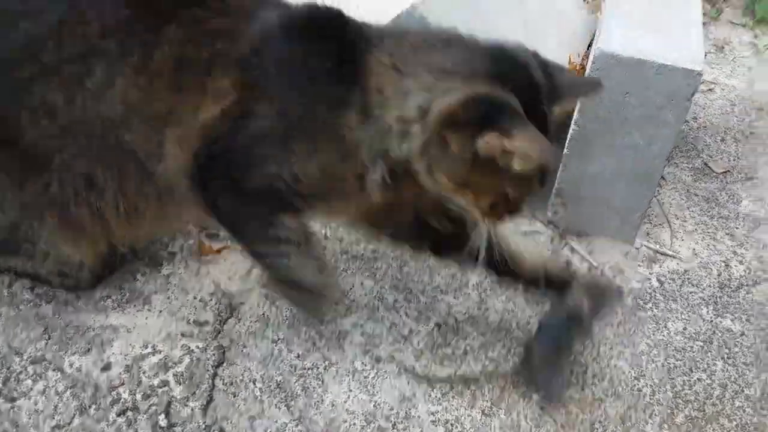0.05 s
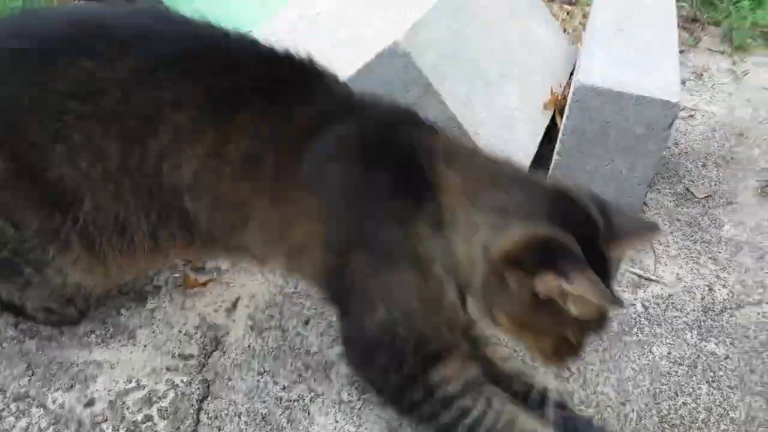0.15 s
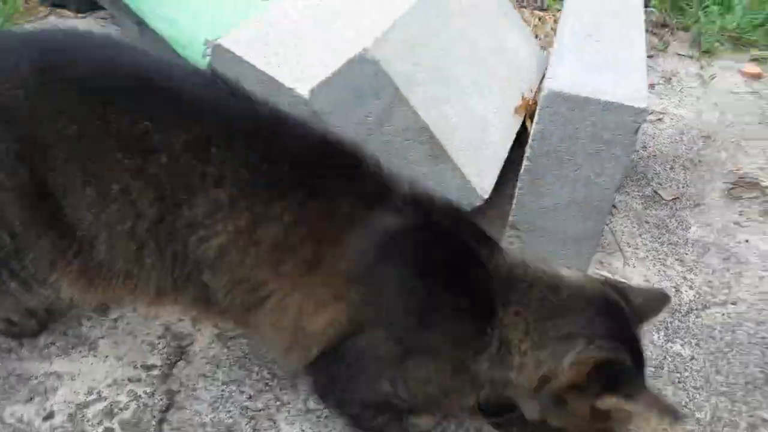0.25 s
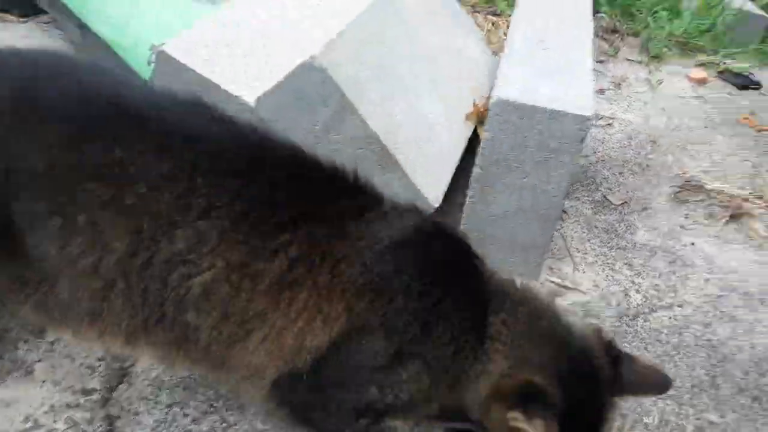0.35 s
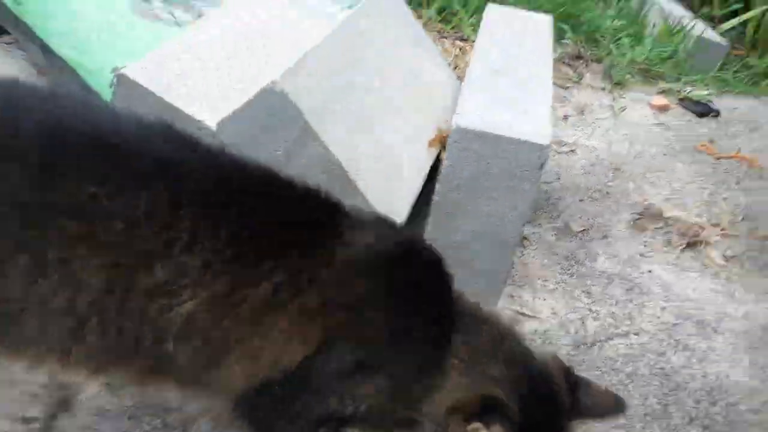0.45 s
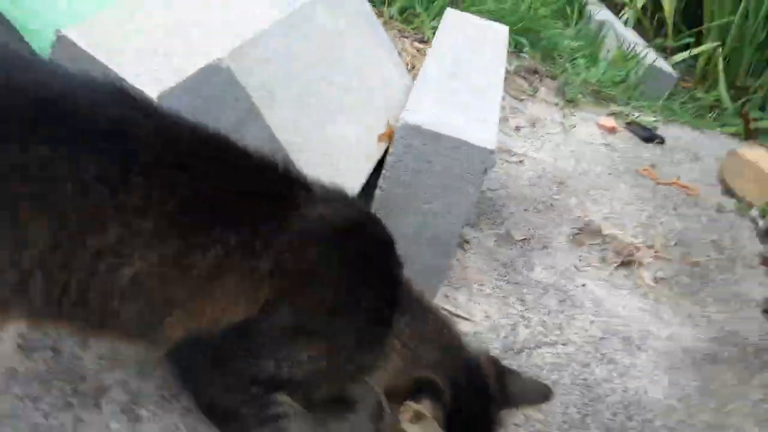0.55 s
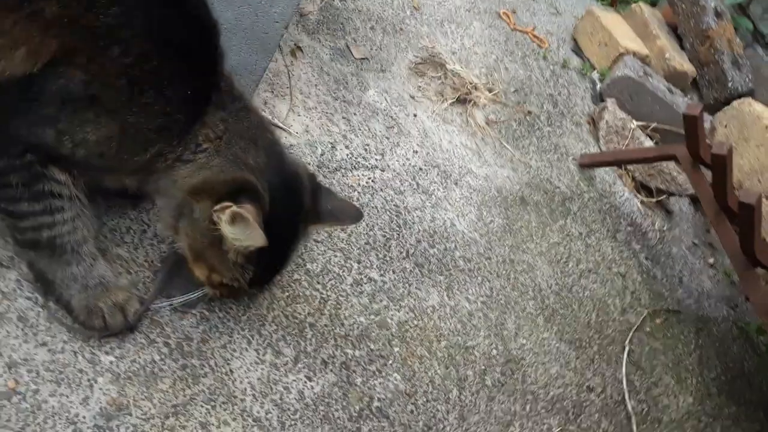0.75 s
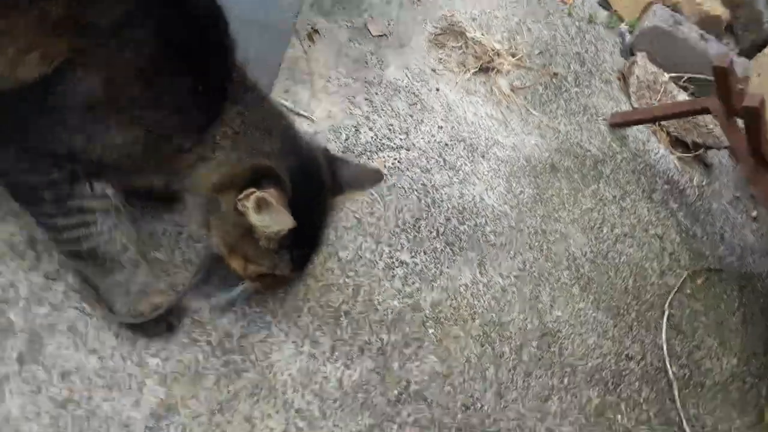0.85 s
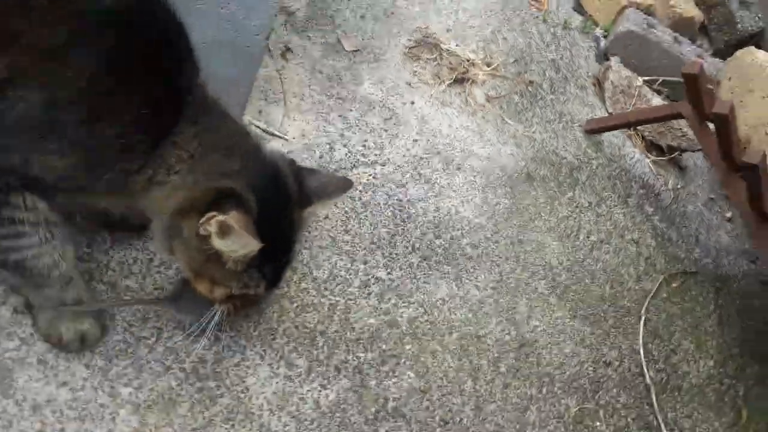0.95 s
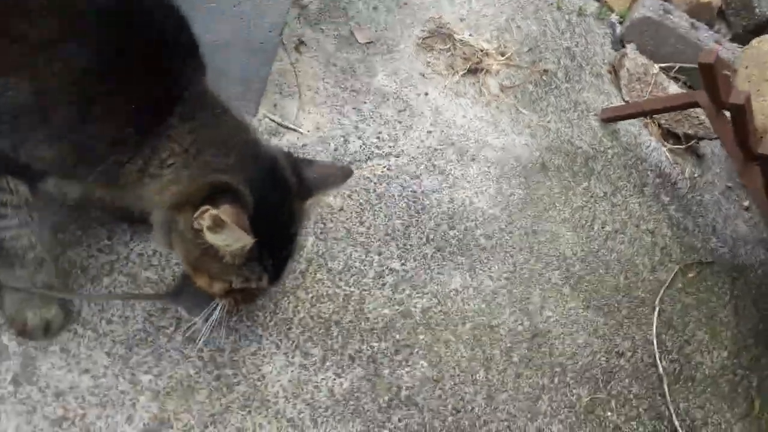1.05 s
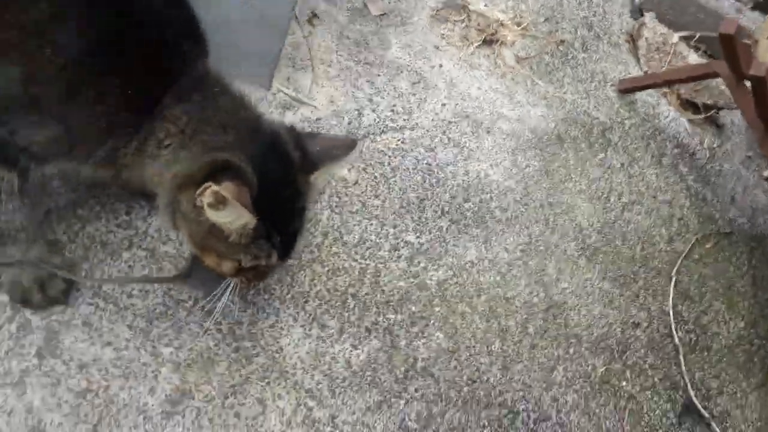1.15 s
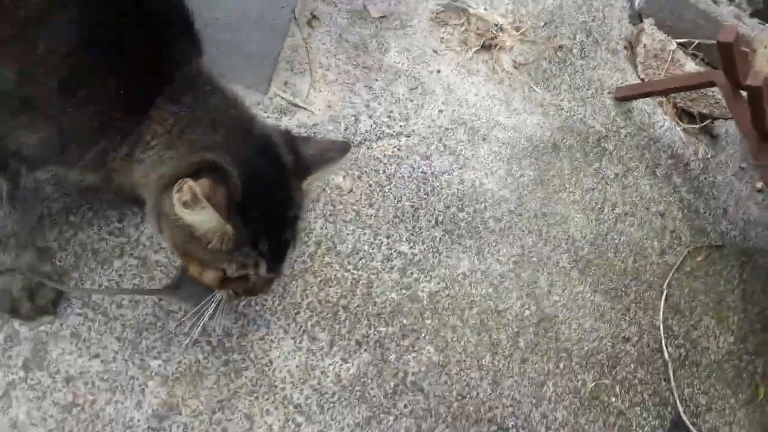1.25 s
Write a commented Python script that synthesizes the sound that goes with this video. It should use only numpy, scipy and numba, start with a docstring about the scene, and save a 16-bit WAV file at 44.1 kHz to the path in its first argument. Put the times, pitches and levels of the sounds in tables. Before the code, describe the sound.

A cat gives one short, harsh growl outdoors over a faint distant motor hum.

```python
"""A cat guards its catch on a concrete yard, close to the left microphone; a distant motor hums throughout.
At 0.2 s it starts one harsh growl, vocal-fold pulses ringing its throat: first a thin raspy snarl,
then a falling yowl that sinks into a rattle, and from 0.6 s a short yelp with a soft bump under it.
A paw scuffs the ground as the voice stops. Nearby walls return a faint, short echo of the growl."""
import sys
import numpy as np
from scipy import signal
from scipy.fft import rfft, irfft
from scipy.io import wavfile
from scipy.ndimage import uniform_filter1d
from numba import njit

SR = 44100
rng = np.random.default_rng(int(sys.argv[2]) if len(sys.argv) > 2 else 0)


def int16_out(signal):
    """Quantize to a 16-bit WAV file."""
    q = np.round(np.clip(np.atleast_2d(signal).T, -1, 1) * 32767)
    wavfile.write(sys.argv[1], SR, q.astype(np.int16))


N = 57330


def growl():
    """Uneven fold pulses and a puff of air in each cycle ring the throat; air hisses past the teeth."""
    # vocal-fold rate in the three parts of the growl (time [s], pitch [Hz])
    snarl_pitch = [(.195, 1273), (.21, 1195), (.222, 1026), (.246, 917), (.262, 1075), (.275, 1294),
                   (.287, 797.8), (.302, 858), (.318, 301.6), (.352, 271.3)]
    yowl_pitch = [(.366, 987), (.385, 1009), (.402, 990.7), (.415, 961), (.425, 999.2), (.435, 983.6),
                  (.45, 889), (.465, 869), (.473, 797.3), (.483, 746.7), (.491, 776.8), (.509, 693.2),
                  (.519, 725.5), (.53, 703), (.551, 659.5), (.574, 651), (.582, 560.4), (.596, 295.7)]
    yelp_pitch = [(.613, 630), (.624, 590), (.633, 720), (.644, 975), (.661, 1003), (.668, 975),
                  (.679, 810)]
    # how hard the cat pushes (time [s], relative level [dB])
    push = [(.192, -75), (.196, -46), (.215, -39.5), (.228, -38.5), (.24, -50.5), (.256, -37.5),
            (.27, -40.5), (.29, -49), (.301, -40.5), (.312, -50), (.328, -44), (.351, -47.5), (.37, -32.5),
            (.389, -26.5), (.399, -35), (.411, -31), (.436, -28.5), (.458, -31.5), (.475, -28),
            (.505, -25.5), (.568, -27), (.583, -33), (.6, -41.5), (.615, -31.5), (.626, -34.5),
            (.645, -24.5), (.661, -23.5), (.673, -30.5), (.681, -38), (.70, -66), (.73, -75)]
    # state of the folds (time [s], roughness [0-1], weakening of every second pulse [0-1])
    fold_state = [(.2, .4, 0), (.222, .15, 0), (.24, .6, .2), (.258, .22, .3), (.272, .7, .2),
                  (.35, .9, .2), (.376, .1, .7), (.389, .06, .55), (.398, .15, .05), (.44, .08, 0),
                  (.464, .25, .05), (.476, .35, .4), (.492, .1, 0), (.512, .2, .2), (.535, .33, .35),
                  (.565, .06, .1), (.582, .35, .15), (.6, .8, .1), (.614, .15, .1), (.632, .4, .35),
                  (.651, .1, .55), (.661, .06, .04), (.67, .15, .05), (.685, .9, .1)]
    # last lone snaps of the folds (time [s], level into the throat [dB])
    snaps = [(0.688, -18), (.6937, -13), (0.71, -18)]
    voice_db, quaver = 13, .009  # quaver: quick tremble, as a share of the pitch
    jitter, shimmer_db, rasp = .075, 2, .6  # at full roughness
    rasp_floor, puff_cycles = .05, .4
    hiss_db, hiss_hz = -16.5, 12750.
    rough, weak = curve(fold_state), curve(fold_state, axis=2)
    pitch = curve(snarl_pitch + yowl_pitch + yelp_pitch) * (1 + quaver * walk(150))
    chance = rng.standard_normal((N, 2))
    pulses, phase = vocal_folds(pitch, jitter * rough, shimmer_db * rough, weak, chance)
    air = unit(np.exp(-phase / puff_cycles) * rng.standard_normal(N))
    effort = undb(voice_db) * envelope(push)
    source = (pulses + (rasp_floor + rasp * rough) * air) * effort
    for at, db in snaps:
        source[int(at * SR)] += undb(db)
    hiss = undb(hiss_db) * steep_band(air * effort, np.full(N, hiss_hz), width_hz=1700.)
    return vocal_tract(source) + hiss


@njit
def vocal_folds(hz, jitter, shimmer_db, weak, chance):
    """One sharp pulse per cycle, each with its own length and size; also the phase of the cycle."""
    limp = .03  # cycles run long and short in turn, by this share at full weakening
    pulses, phase, turn, cycle = np.zeros(len(hz)), np.zeros(len(hz)), 0., 0
    for i in range(8, len(hz) - 9):
        detune = jitter[i] * chance[cycle, 0] + limp * weak[i] * (2 * (cycle % 2) - 1)
        step = hz[i] * np.exp(detune) / SR
        turn += step
        if turn >= 1:
            turn, cycle = turn - 1, cycle + 1
            shimmer = 10 ** (shimmer_db[i] * chance[cycle, 1] / 20)
            size = shimmer * (1 - weak[i] * (cycle % 2)) / np.sqrt(step)
            for j in range(-7, 8):  # a windowed sinc places the pulse between samples
                lag = j + turn / step + 1e-9
                window = .5 + .5 * np.cos(np.pi * lag / 8)
                pulses[i + j] += size * np.sin(np.pi * lag) / (np.pi * lag) * window
        phase[i] = turn
    return pulses, phase


def vocal_tract(source):
    """The throat gives a steady colour; the moving mouth adds three gliding resonances."""
    # throat response (frequency [Hz], gain [dB])
    throat_colour = [(300, -44), (600, -33), (760, -26), (980, -16), (1300, -14), (2000, -12), (2700, -9),
                     (3400, -9), (4000, -11), (4500, -8), (5700, -7), (6500, -17), (7600, -21), (8700, -38),
                     (10500, -27), (12400, -19), (14000, -18), (15800, -24)]
    # mouth resonances (time [s], low [Hz], gain [dB], main [Hz], gain [dB], upper [Hz], gain [dB])
    resonances = [(.21, 1100, -3, 5500, -10, 7600, 19.5), (.255, 2160, -5, 3320, -2.5, 7900, 7.5),
                  (.32, 1760, 8, 4950, -26, 6830, 9), (.37, 2280, -12, 4800, -6, 7600, -7),
                  (.39, 1140, 3.5, 4900, -7, 7360, 10.5), (.43, 1030, 0.5, 5240, 5.5, 7430, 14),
                  (.49, 1510, -42, 5880, 4.5, 6820, 7), (.56, 1310, -34, 5072, 8.5, 6300, -5),
                  (.615, 1370, -42, 4520, -1, 6940, 7), (.66, 2020, -43, 4520, 6, 7400, 5.5)]
    throat = colour(source, throat_colour)
    mouth = np.zeros(N)
    for k, width_hz in enumerate([800., 1700., 1400.]):
        hz, db = curve(resonances, axis=2 * k + 1), curve(resonances, axis=2 * k + 2)
        mouth += undb(db) * steep_band(throat, hz, width_hz)
    return throat + mouth


def bump():
    """A soft low bump under the yelp, equal in both microphones."""
    at_s, hz, width_s, db = .656, 221.4, .0032, -35.5
    t = np.arange(N) / SR - at_s
    return undb(db) * np.exp(-.5 * (t / width_s) ** 2) * np.sin(2 * np.pi * hz * t)


def scuff():
    """Paws and fur brush the concrete faintly as the cat settles."""
    # contact with the ground (time [s], level [dB])
    contact = [(.66, -70), (.685, -60), (.715, -51), (.75, -68), (.8, -83)]
    # colour of the brushing (frequency [Hz], relative level [dB])
    brush = [(150, -10), (400, -2), (900, 0), (2000, -5), (5000, -14), (14000, -26)]
    return envelope(contact) * np.array([unit(colour(rng.standard_normal(N), brush)) for _ in range(2)])


def echo(x):
    """Dull, short scatter from nearby blocks and walls, with its own tail at each microphone."""
    # colour of the scatter (frequency [Hz], gain [dB])
    walls = [(300, 0), (1000, 0), (2200, -3), (4000, -9), (6000, -13), (8000, -14), (14000, -18)]
    echo_db, t60_s, delay_s = -16, .08, .002
    t = np.arange(SR // 2) / SR
    tails = rng.standard_normal((2, len(t))) * undb(-60 * t / t60_s) * (t > delay_s)
    dull = colour(x, walls)
    return undb(echo_db) * np.array([signal.fftconvolve(dull, h / np.linalg.norm(h))[:N] for h in tails])


def yard():
    """Low outdoor rumble, spread across the pair as mid and side noise."""
    # spectrum of the open air (frequency [Hz], relative density [dB])
    rumble = [(15, -47), (25, -31.5), (59, -1.5), (79, -0.5), (96, -4.5), (122, -1), (169, 0), (240, -9),
              (389, -16.5), (666, -20), (762, -16), (3630, -33.5), (7700, -33), (10900, -48.5),
              (15500, -36)]
    # stereo width (frequency [Hz], side minus mid [dB])
    spread = [(50, -3), (150, -10.5), (500, -5.5), (1200, 3), (3000, -1), (12000, -0.5)]
    yard_db = -52
    mid, side = (undb(yard_db + .5 * walk(14)) * unit(colour(rng.standard_normal(2 * N), rumble)[N:])
                 for _ in range(2))
    return mid + colour(side, spread) * np.array([[1], [-1]])


def motor():
    """A distant motor hums on four tones, each wavering in level and phase."""
    # tones of the hum (frequency [Hz], level [dB], wavering [0-1])
    tones = [(69, -61, 0.42), (118.9, -63, 0.43), (240, -60, 0.23), (369, -76, 0.58)]
    t = np.arange(N) / SR
    hum = np.zeros(N)
    for hz, db, waver in tones:
        drift = 1 + waver * (walk(12) + 1j * walk(11.56))
        hum += np.sqrt(2) * undb(db) * np.real(drift * np.exp(2j * np.pi * hz * t))
    return hum


def undb(db):
    """Decibels to gain."""
    return 10 ** (np.asarray(db) / 20)


def unit(x):
    """Scale to rms 1."""
    return x / np.sqrt(np.mean(x ** 2))


def curve(rows, axis=1):
    """One column of a table, joined by straight lines in time."""
    rows = np.array(rows, float)
    return np.interp(np.arange(N) / SR, rows[:, 0], rows[:, axis])


def envelope(rows):
    """Gain through (time [s], level [dB]) points, silent before and after them."""
    t = np.arange(N) / SR
    return undb(curve(rows)) * (t > rows[0][0]) * (t < rows[-1][0])


def colour(x, points, size=8192):
    """Minimum-phase filter through (frequency [Hz], gain [dB]) points."""
    hz, db = np.array(points, float).T
    bins_hz = np.arange(size // 2 + 1) * SR / size
    gain = undb(np.interp(np.log(bins_hz + 1), np.log(hz), db))
    cepstrum = irfft(np.log(gain))
    cepstrum[1:size // 2] *= 2
    cepstrum[size // 2 + 1:] = 0
    return signal.fftconvolve(x, irfft(np.exp(rfft(cepstrum))))[:len(x)]


def walk(per_s):
    """Smooth random drift of rms 1."""
    hold = int(SR / per_s)
    steps = np.repeat(rng.standard_normal(N // hold + 1), hold)
    return unit(uniform_filter1d(uniform_filter1d(steps, hold), hold)[:N])


@njit
def resonate(x, hz, width_hz):
    """Moving band-pass, gain 1 at the centre."""
    y, band_state, low_state = np.empty(len(x)), 0., 0.
    for i in range(len(x)):
        tuning, damping = np.tan(np.pi * hz[i] / SR), width_hz / hz[i]
        band = (band_state + tuning * (x[i] + 1e-18 - low_state)) / (1 + tuning * (tuning + damping))
        band_state, low_state = 2 * band - band_state, low_state + 2 * tuning * band
        y[i] = damping * band
    return y


def steep_band(x, hz, width_hz):
    """The same resonance twice, for dark valleys beside it."""
    return resonate(resonate(x, hz, width_hz), hz, width_hz)


def scene():
    """The cat is close in front of the left microphone; the right one faces away and hears it duller."""
    # shading at the right microphone (frequency [Hz], gain [dB])
    shadow = [(300, 0), (700, -2), (1300, -1), (2100, -7), (3000, -11), (4000, -11), (5000, -17),
              (6000, -25), (8100, -24), (12000, -21), (15000, -29)]
    cat = growl()
    return np.array([cat, colour(cat, shadow)]) + echo(cat) + bump() + scuff() + yard() + motor()


def record(dry):
    """The recorder cuts the top treble steeply."""
    top_hz = 15650
    return signal.sosfilt(signal.ellip(10, .2, 80, top_hz, fs=SR, output="sos"), dry)


dry = scene()
out = record(dry)
int16_out(out)
```